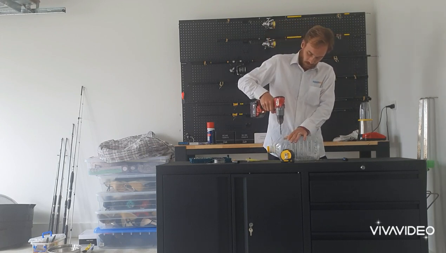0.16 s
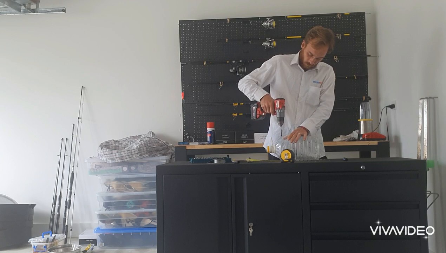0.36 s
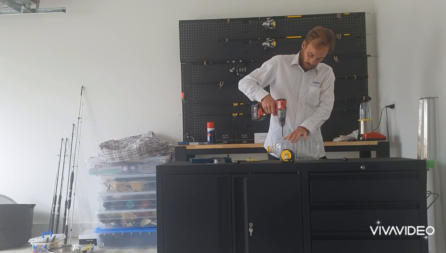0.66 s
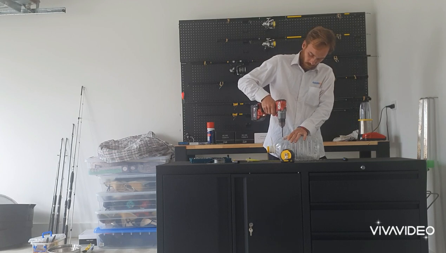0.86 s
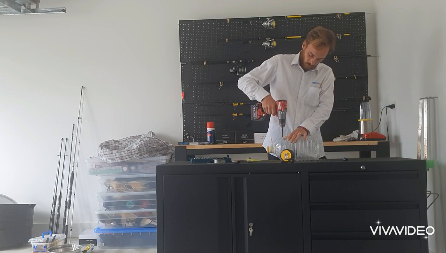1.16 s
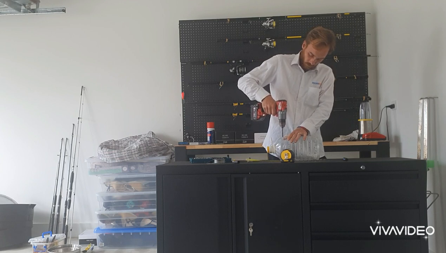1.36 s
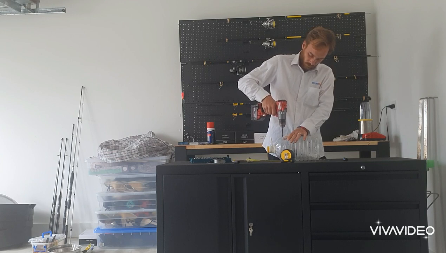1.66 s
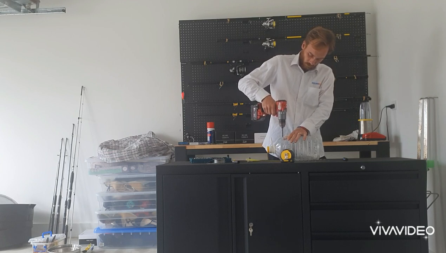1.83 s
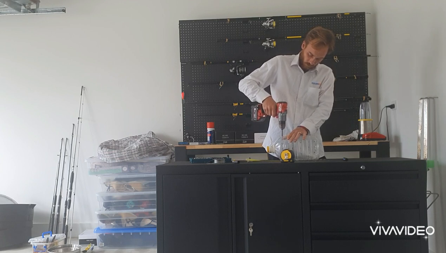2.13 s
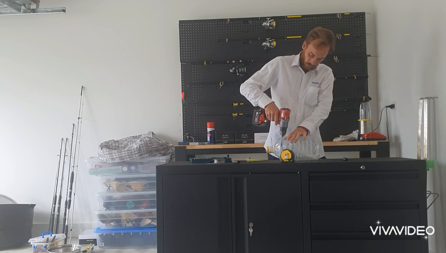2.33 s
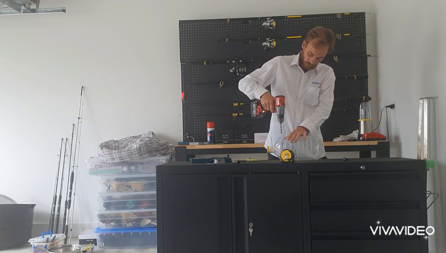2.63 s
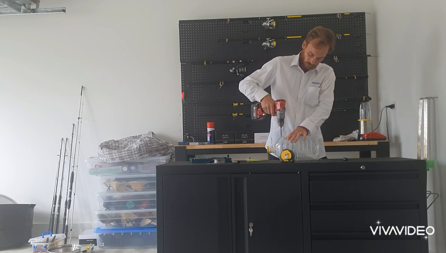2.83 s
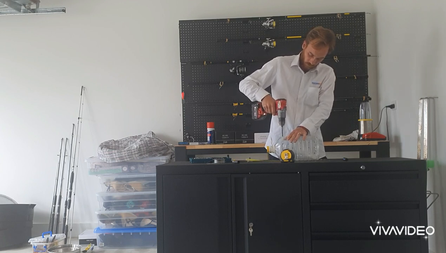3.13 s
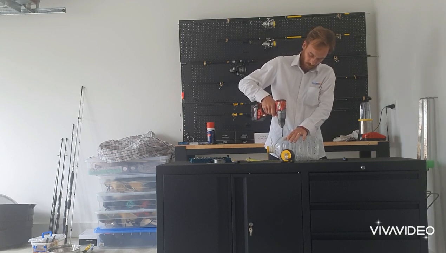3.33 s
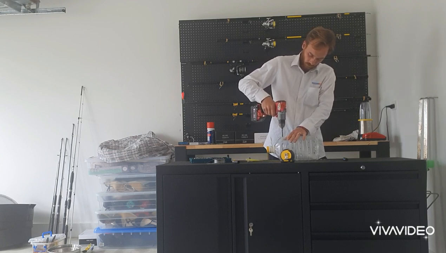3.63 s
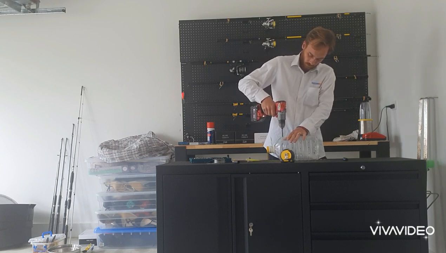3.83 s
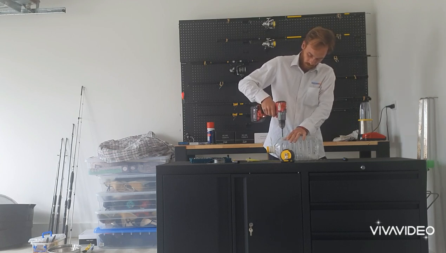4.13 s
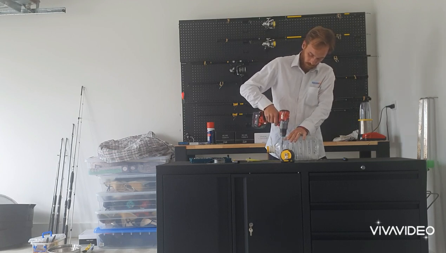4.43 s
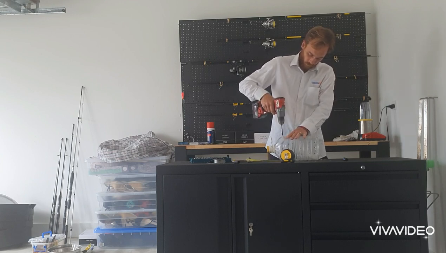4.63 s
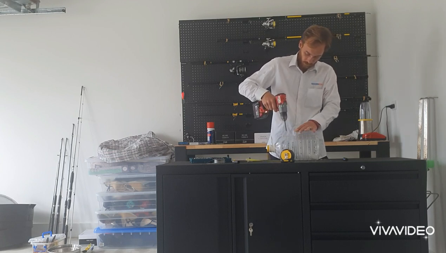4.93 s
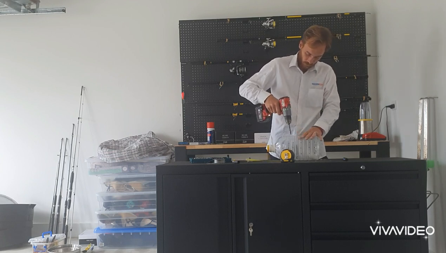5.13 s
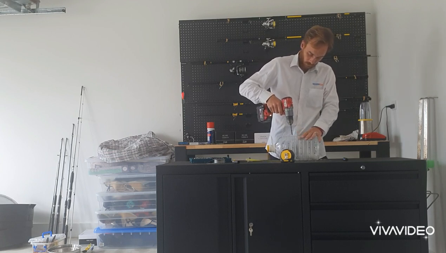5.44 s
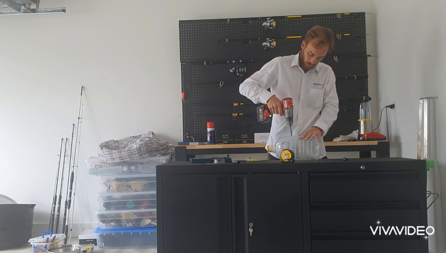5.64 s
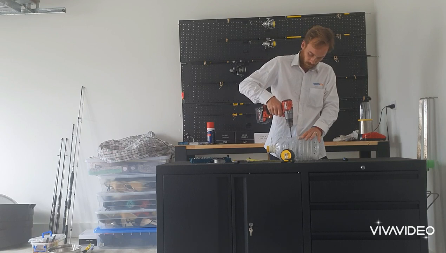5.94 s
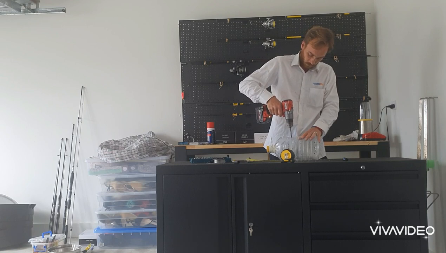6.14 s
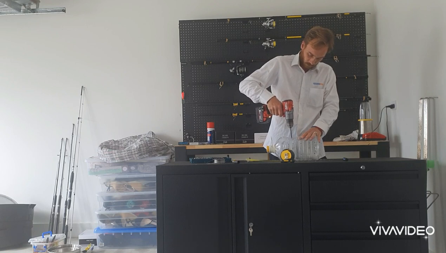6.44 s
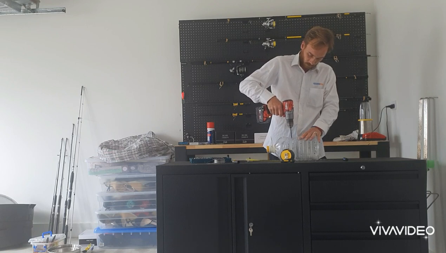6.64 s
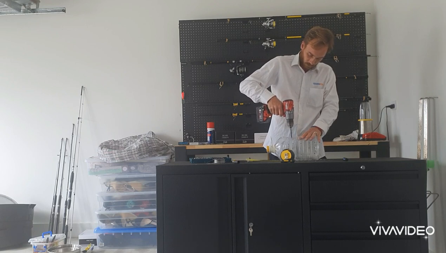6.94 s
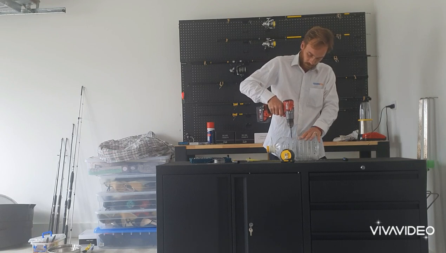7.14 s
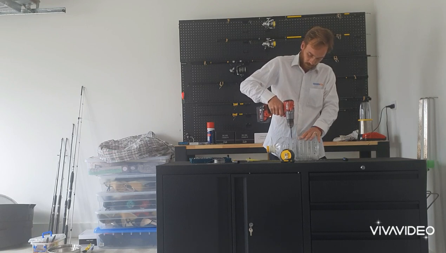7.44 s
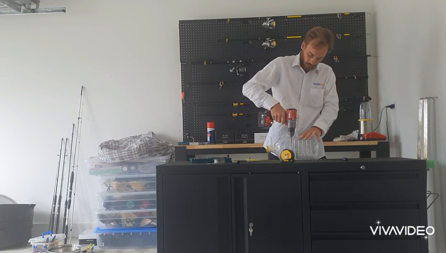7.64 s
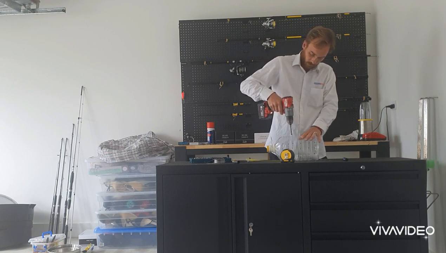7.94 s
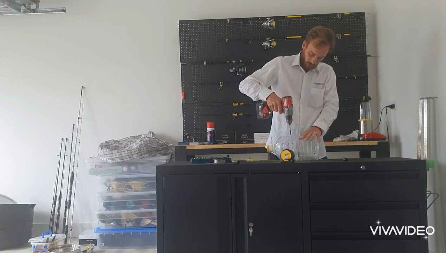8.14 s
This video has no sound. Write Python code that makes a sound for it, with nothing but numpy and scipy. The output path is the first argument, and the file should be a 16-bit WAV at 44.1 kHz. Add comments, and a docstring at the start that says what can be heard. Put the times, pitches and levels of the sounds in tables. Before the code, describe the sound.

Short bursts of a small electric drill, each a rising whine with gear rattle, then a crackling plastic breakthrough and an abrupt motor stop.

```python
"""A cordless drill bores holes in a thin plastic bottle on a workbench, a few metres away in a bare garage. At
each trigger pull the motor whine sweeps through the housing resonance, with gear tones, growl and rattle. The
bit, modelled as shaped noise, snags and chatters in the bottle wall, and once squeaks as a sine at a wavering
pitch; the chuck clacks. Noise reflections with an octave-wise decay ring on, over a faint coloured-noise
ambience."""
import sys
import numpy as np
from scipy import signal
from scipy.fft import rfft, irfft, next_fast_len
from scipy.io import wavfile

SR = 44100
rng = np.random.default_rng(int(sys.argv[2]) if len(sys.argv) > 2 else 0)


def unload_audio(sound):
    """Save the sound as a 16-bit wav file, at the path given as the first command line argument."""
    columns = np.transpose(np.atleast_2d(sound))
    # keep every value between -1 and 1, then stretch to whole-number steps
    steps = np.round(np.clip(columns, -1, 1) * 32767)
    wavfile.write(sys.argv[1], SR, steps.astype(np.int16))


N = 365588
TIME = np.arange(N) / SR  # s

FULL_HZ = 425.9  # nominal motor top speed, turns/s
GEAR_RATIO = 15  # motor turns per chuck turn

# noise spectrum of the cracking, scraped rim: f/Hz, relative level/dB per Hz
RIM_SPECTRUM = [(300, -9), (700, -1), (1600, 6), (3000, 3), (6000, -6.5), (8000, -24.5), (12000, -18.5),
                (16000, -44)]
# noise spectrum of the bottle's hollow body on the bench: f/Hz, relative level/dB per Hz
BODY_SPECTRUM = [(22, -47.5), (45, -23.5), (88, -3.5), (125, -12), (180, -1), (228, 5), (290, -11),
                 (600, -31.5), (3000, -58)]
# noise spectrum of the bottle's thin wall: f/Hz, relative level/dB per Hz
WALL_SPECTRUM = [(60, -42), (240, -21), (340, 0.5), (410, 1.5), (480, 4.5), (570, -10), (690, -7.5),
                 (1400, -16.5), (2500, -31), (8000, -61)]


def undb(db):
    """Decibels to gain."""
    return 10 ** (np.asarray(db) / 20)


def unit(x):
    """Scale to an rms of 1."""
    return x / np.sqrt(np.mean(x ** 2))


def at(table, hz):
    """Read (Hz, value) points on a log-frequency axis."""
    points, values = np.transpose(table)
    return np.interp(np.log(np.maximum(hz, 1)), np.log(points), values)


def colour(x, spectrum):
    """Filter by a (Hz, dB) spectrum, keeping the power of white noise."""
    fast = next_fast_len(2 * x.shape[-1])
    gain = unit(undb(at(spectrum, np.fft.rfftfreq(fast, 1 / SR))))
    return irfft(rfft(x, fast) * gain, fast)[..., :x.shape[-1]]


def walk(rate_hz):
    """Slow random curve with a spread near 1, a new random point rate_hz times a second."""
    steps = rng.standard_normal(8192)
    return 1.2 * np.interp(TIME * rate_hz, np.arange(len(steps)), steps)


def swell(curves, fade_s=.06):
    """Gain from several (s, dB) curves, silent between them."""
    gain = np.zeros(N)
    for s, db in map(np.transpose, curves):
        inside = np.interp(TIME, [s[0] - fade_s, s[0], s[-1], s[-1] + fade_s], [0, 1, 1, 0])
        gain += inside * undb(np.interp(TIME, s, db))
    return gain


def envelope(start_s, attack_s, hold_s, release_s):
    """A straight rise, a hold counted from the start, then an exponential fall."""
    age_s = TIME - start_s
    return np.clip(age_s / attack_s, 0, 1) * np.exp(-np.maximum(age_s - hold_s, 0) / release_s)


def tones(turns, table, flutter_db):
    """Multiples of a shaft's rotation, each fluttering in level."""
    total = 0
    for multiple, db in table:
        level = undb(db + flutter_db * walk(25))
        total = total + level * np.sin(2 * np.pi * (multiple * turns + rng.random()))
    return total


def diffuse(size):
    """White noise from all sides: alike at both microphones in the bass, unrelated in the treble."""
    # stereo spread: f/Hz, side minus mid/dB
    spread = [(60, -10.5), (150, -20.5), (260, -4), (500, -7), (1000, 1.5), (16000, 1)]
    mid, side = rfft(rng.standard_normal((2, size)))
    share = undb(at(spread, np.fft.rfftfreq(size, 1 / SR)))
    left_right = mid + share * side * np.array([[1], [-1]])
    return irfft(left_right / np.sqrt(1 + share ** 2), size)


def ambience(level_db=-57.5, waver_db=1.2):
    """Diffuse coloured noise, wavering slightly in level."""
    # background spectrum: f/Hz, relative level/dB per Hz
    background = [(15, -25), (25, -18), (53, -2.5), (250, -11.5), (286, -19.5), (588, -23), (1390, -17.5),
                  (1630, -17), (1760, -19), (2370, -27.5), (5140, -35.5), (8320, -49), (15000, -53.5)]
    return undb(level_db + waver_db * walk(5)) * colour(diffuse(N), background)


def garage_tail(onset_s=.002, rise_s=.0013):
    """Dense wall reflections; each octave dies at its own rate."""
    # garage decay: f/Hz, reverberation time/s
    decay = [(100, 0.55), (400, 0.56), (1500, 0.64), (4000, 0.52), (12000, 0.4)]
    t, hz = TIME[:SR], np.fft.rfftfreq(SR, 1 / SR)
    noise = rfft(diffuse(SR))
    centres_hz = 2. ** np.arange(6, 15)
    tail = 0
    for centre_hz, weights in zip(centres_hz, np.eye(len(centres_hz))):
        band = irfft(noise * at(np.c_[centres_hz, weights], hz), SR)
        tail = tail + band * 1000 ** (-t / at(decay, centre_hz))  # -60 dB per reverberation time
    tail = tail * np.clip((t - onset_s) / rise_s, 0, 1)
    return unit(tail) / np.sqrt(SR)


def room(x, tail, wet_db, shadow_hz=4000):
    """Direct sound, late and dull at the left microphone, plus the walls; nominal power is kept."""
    pole = np.exp(-2 * np.pi * shadow_hz / SR)
    direct = np.array([signal.lfilter([1 - pole], [1, -pole], x), x])
    walls = signal.fftconvolve(x[None], tail, axes=1)[:, :N]
    return (direct + undb(wet_db) * walls) / np.hypot(1, undb(wet_db))


def squeak(start_s=8.005, pitch_hz=1440, level_db=-25, jitter=.0252):
    """The bit sticks and slips on the rim on its way out of the last hole: a sine at an unsteady pitch."""
    hz = pitch_hz * (1 + jitter * walk(300))
    rub = envelope(start_s, attack_s=.015, hold_s=.02, release_s=.04)
    return undb(level_db) * rub * np.sin(2 * np.pi * np.cumsum(hz) / SR)


def knocks(wall_db=-4, boom_db=2, crack_db=0, rise_s=.0017, buckle_s=.021):
    """Each blow buckles the plastic for a moment: the wall drums, the body booms and the rim cracks."""
    # bit snags, chuck clacks, bottle knocks: t/s, relative wall level/dB, boom level/dB, crack level/dB
    blows = [(0.003, -15, -37, -25), (0.047, -18, -38, -30), (0.942, -36.5, -59.5, -76),
             (2.23, -5, -25.5, -16), (2.302, -10, -25, -31), (2.446, -9, -31, -19), (2.5, -13, -22, -27),
             (3.052, -42, -53, -46), (3.525, -35, -42, -68), (4.336, -2.5, -23, -16),
             (4.562, -15, -33, -20), (4.624, -15, -35, -10), (5.218, -34.5, -34, -54),
             (5.646, -46, -39, -57), (5.865, -23, -32, -68), (7.635, -2.5, -16.5, -18),
             (7.781, -9, -23, -24), (7.864, -13, -22, -18)]
    force = np.zeros((3, N))
    for start_s, *levels_db in blows:
        first = int(start_s * SR)
        age_s = TIME[:N - first]
        # light touches of the hand build up more slowly than hard snags
        build_s = rise_s * np.interp(levels_db[0], [-35, -15], [7, .5])
        push = np.exp(-age_s / buckle_s) * (1 - np.exp(-age_s / build_s))
        force[:, first:] += undb(levels_db)[:, None] * push
    wall, boom, crack = force * rng.standard_normal((3, N))
    drumming = undb(wall_db) * colour(wall, WALL_SPECTRUM)
    booming = undb(boom_db) * colour(boom, BODY_SPECTRUM)
    return drumming + booming + undb(crack_db) * colour(crack, RIM_SPECTRUM)


def snagging(attack_s=.01, sag_db_per_s=14, release_s=.05):
    """How hard the bit catches the wall: most at the breakthrough, less as the hole is reamed out."""
    # bit chatter: start t/s, held duration/s, level at start/dB
    catches = [(-.1, .08, -20), (2.22, .42, -23.5), (4.32, .53, -27.3), (7.63, .39, -25.5)]
    grip = 0
    for start_s, held_s, db in catches:
        sagging_db = db - sag_db_per_s * np.maximum(TIME - start_s, 0)
        grip = grip + envelope(start_s, attack_s, held_s, release_s) * undb(sagging_db)
    return grip


def chatter(turns, slip_db=5.0, bite_s=.0066, wall_db=-2, scrape_db=-10):
    """The two flutes catch the thin wall in turn, one harder; the bottle drums and the rim scrapes."""
    flute = np.floor(2 * turns / GEAR_RATIO).astype(int)
    strength = np.where(flute % 2, 1, .5) * undb(slip_db * np.tanh(walk(60)))
    catches = np.diff(flute, prepend=0) * strength
    bites = signal.lfilter([1], [1, -np.exp(-1 / (bite_s * SR))], catches)
    force = (.59 + .87 * bites) * rng.standard_normal(N)
    body = colour(force, BODY_SPECTRUM)
    wall = undb(wall_db) * colour(force, WALL_SPECTRUM)
    rim = undb(scrape_db) * colour(force, RIM_SPECTRUM)
    return snagging() * (body + wall + rim)


def clearness():
    """The gear tones are clear until the bit breaks through and starts to chatter."""
    return 1 / (1 + snagging() / undb(-25))


def current_pull():
    """The columns of the latest trigger pull, at every moment."""
    # trigger pulls: pressed t/s, released t/s, gear growl level/dB, pinion whine level/dB
    pulls = np.array([(-1.5, -.11, -29, -50), (1.03, 2.42, -37.5, -37), (3.52, 4.517, -32.5, -31),
                      (5.913, 7.83, -26, -44)])
    return pulls[np.searchsorted(pulls[:, 0], TIME) - 1].T


def motor_speed(brake_s=.15, current_dies_s=.032):
    """Turns/s: soft start, wavering speed, ever harder braking; also the drive current that dies on release."""
    # soft start, same at every pull: t after press/s, share of full speed
    run_up = [(0, 0), (.32, .725), (.41, .865), (.46, .957), (.52, .985), (.6, .997), (.8, 1)]
    pressed_s, released_s, _, _ = current_pull()
    since_release_s = np.maximum(TIME - released_s, 0)
    braking = np.minimum(since_release_s / brake_s, 1)
    hz = FULL_HZ * np.interp(TIME - pressed_s, *np.transpose(run_up)) * (1 - braking ** 1.4)
    drive = np.exp(-since_release_s / current_dies_s)
    return hz * (1 + .0006 * walk(9) + .0011 * walk(90)), drive


def gear_force(hz, level_db=-31.9, speed_law=1.05):
    """The faster the gears turn, the harder their teeth meet: a power of the speed."""
    return undb(level_db) * (hz / FULL_HZ) ** speed_law


def rattle(hz, turns, grain_db=4, repeat_db=-12, pulsing=.48, rattle_db=6.0, hiss_db=-49):
    """Gear ticks in a pattern that repeats each chuck turn, among loose ticks, fan rush and brush hiss."""
    # gear rattle spectrum: f/Hz, relative level/dB per Hz
    gear_spectrum = [(25, -40.5), (50, -25), (88, -12), (125, -18), (210, -15), (420, -12), (580, -17.5),
                     (820, -8.5), (1900, -13.5), (3000, -11.5), (5700, -17.5), (6800, -22), (7700, -33),
                     (15500, -28)]
    teeth = rng.standard_normal(32 * GEAR_RATIO)
    tooth = np.floor(32 * turns).astype(int)
    pattern = np.diff(tooth, prepend=0) * teeth[tooth % len(teeth)]
    pulse = 1 + pulsing * np.cos(2 * np.pi * turns)
    loose = rng.standard_normal(N) * undb(grain_db * walk(900)) * pulse
    gears = colour(unit(loose) + undb(repeat_db) * unit(pattern), gear_spectrum)
    # the brushes hiss as soon as the rotor moves
    hiss = colour(rng.standard_normal(N), [(1000, -12.5), (3000, -8.5), (6300, 11), (7600, -15),
                                           (10000, -2), (12000, 10.5), (15500, -18.5)])
    hissing = undb(hiss_db) * (hz / hz.max()) ** .7 * hiss
    return undb(rattle_db) * gear_force(hz) * unit(gears) + hissing


def growl(hz, turns, speed_law=1.2, hum_db=-43, flutter_db=1.5, rough=.47):
    """The rotor shakes the bottle once a turn; near full speed the bit grinding on the bottle adds tones at
    multiples of the chuck speed."""
    # response of bottle and bench to the drill's shaking: f/Hz, relative level/dB
    soundboard = [(100, -13.5), (170, -7.5), (228, 2.5), (280, -16.5), (340, -0.5), (380, -1), (425, -5),
                  (500, -6)]
    # grinding tones of the bit on the bottle: multiple of chuck speed, relative level/dB
    grinding_tones = [(6, -30), (8, -6), (9, -29), (12, -8), (13, -7), (16, -14), (17, -5)]
    surge_s, surge_width_s, surge_peak_db = .52, .06, 5.5  # as the motor tops out, after the press
    pace = hz / hz.max()
    pressed_s, _, growl_db, _ = current_pull()
    hum = undb(at(soundboard, hz)) * np.sin(2 * np.pi * turns)
    wobble = pace ** 6 * tones(turns / GEAR_RATIO, grinding_tones, flutter_db)
    surge_db = surge_peak_db * np.exp(-((TIME - pressed_s - surge_s) / surge_width_s) ** 2)
    shaking = undb(growl_db + surge_db) * pace ** speed_law * clearness() * (hum + wobble)
    return (shaking + undb(hum_db) * np.sqrt(pace) * hum) * (1 + rough * walk(110))


def speed_control(hz, turns, chop_hz=7900, sing_db=-50, octave_db=-5):
    """Current chopped only below full speed; the turning poles split its tone into a rising and a falling one."""
    chopping = np.interp(hz / hz.max(), [0, .03, .3, .7, .92], [0, .35, 1, 1, 0])
    poles = np.cos(2 * np.pi * 4 * turns)
    phase = 2 * np.pi * chop_hz * TIME
    return undb(sing_db) * chopping * poles * (np.sin(phase) + undb(octave_db) * np.sin(2 * phase))


def mesh_tones(hz, turns, level_db=4, flutter_db=2.5):
    """Motor and gear mesh tones, locked to the motor turns and growing with speed."""
    # motor and mesh tones: multiple of motor speed, relative level/dB
    motor_tones = [(28 / 15, -10.5), (33 / 15, -10.5), (4, -9.5), (61 / 15, -12), (6, -14.5), (7.8, -23.5),
                   (10, -22.5), (26, -22.5)]
    return undb(level_db) * gear_force(hz) * hz / FULL_HZ * tones(turns, motor_tones, flutter_db)


def whine(hz, turns, steady_db=6, ring_db=-16.5, overtone_db=-7.5, buzz_db=-37, strain_db=-36):
    """Eight magnetic tugs a turn; they and their overtones ring the housing as they sweep its resonance."""
    # response of the housing to a tone: f/Hz, relative level/dB
    housing = [(1200, -37), (1900, -16), (2380, -10.5), (2520, 4), (2790, -1.5), (2890, 7.5), (3220, -1.5),
               (3330, -11.5), (3400, -30), (4000, -55)]
    # steady whine near full speed, one curve per pull from the second on: t/s, relative level/dB
    whine_curves = [
        [(1.55, -38), (1.6, -33), (1.65, -37), (1.82, -31), (2.0, -30), (2.24, -31), (2.29, -42), (2.41, -37)],
        [(4.04, -40), (4.09, -34), (4.22, -32), (4.33, -32), (4.42, -35), (4.5, -39)],
        [(6.44, -36), (6.54, -41), (6.65, -38), (6.81, -36), (6.9, -47), (7.4, -53), (7.72, -43), (7.81, -36)],
    ]
    pace = hz / hz.max()
    steady = swell(whine_curves) * np.sin(2 * np.pi * 8 * turns)
    # the pinion bears hardest while the motor gathers speed
    strain = undb(strain_db) * np.interp(pace, [.6, .9, .98, .992], [0, 1, 1, 0])
    *_, pinion_db = current_pull()
    meshing = undb(pinion_db) * clearness() * np.interp(pace, [.97, .99], [0, 1])
    pinion = (meshing + strain) * np.sin(2 * np.pi * 13 * turns)
    tugs = [undb(at(housing, k * hz)) * np.sin(2 * np.pi * k * turns) for k in (8, 16, 18, 24)]
    overtones = tugs[1] + .5 * tugs[2] + .5 * tugs[3]
    ring = undb(ring_db) * pace * (tugs[0] + undb(overtone_db) * overtones)
    uneven = 1 + .25 * walk(250)
    # at low speed the chopped current shakes the housing roughly
    roughness = np.interp(pace, [0, .12, .25, .45, .7], [.031, .29, 1, .72, .25])
    buzz = undb(buzz_db) * roughness * colour(rng.standard_normal(N), housing)
    return undb(steady_db) * steady + pinion + ring * uneven + buzz


def scene():
    """Drill and bottle in the garage, over its faint ambience."""
    hz, drive = motor_speed()
    turns = np.cumsum(hz) / SR
    tail = garage_tail()
    background = ambience()
    bottle = room(squeak() + knocks() + chatter(turns), tail, wet_db=1)
    gears = room(rattle(hz, turns), tail, wet_db=8)
    shaking = room(growl(hz, turns), tail, wet_db=-1)
    singing = drive * (speed_control(hz, turns) + mesh_tones(hz, turns) + whine(hz, turns))
    return background + bottle + gears + shaking + room(singing, tail, wet_db=1)


def record(dry, top_hz=15600):
    """Frequency-dependent balance, mostly towards the right microphone; a steep low-pass cuts the top."""
    # stereo balance: f/Hz, left minus right/dB
    lean = [(60, 0.5), (110, -0.5), (200, -1.0), (380, -3), (700, -4.5), (1290, -5), (2380, -4.5),
            (4400, -1), (8120, -6.5), (15000, -8.5)]
    size = next_fast_len(N + SR)
    lean_db = at(lean, np.fft.rfftfreq(size, 1 / SR))
    balance = undb(np.array([lean_db, -lean_db]) / 2)
    heard = irfft(rfft(dry, size) * balance, size)[:, :N]
    return signal.sosfilt(signal.ellip(10, .2, 80, top_hz, fs=SR, output="sos"), heard)


dry = scene()
out = record(dry)
unload_audio(out)
```